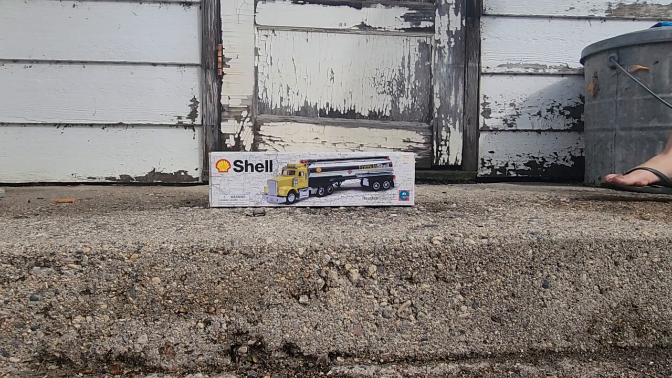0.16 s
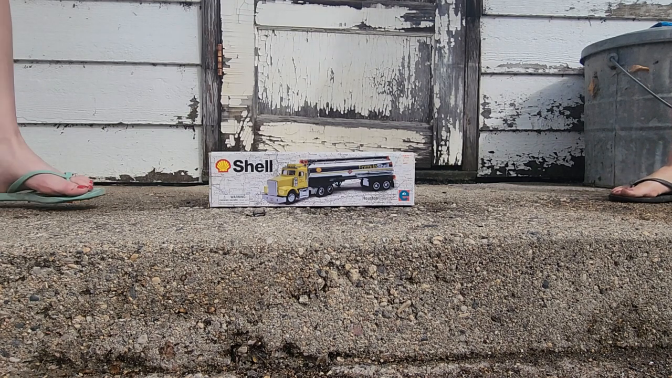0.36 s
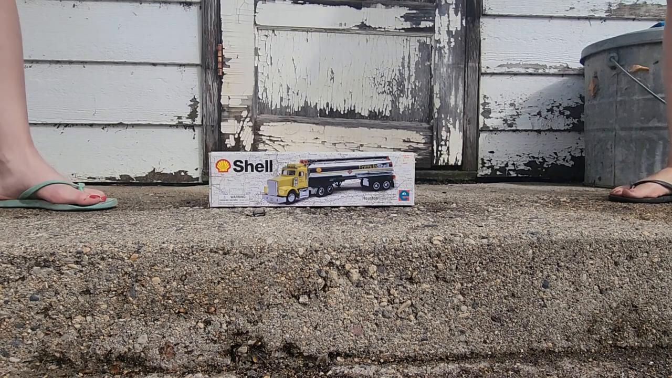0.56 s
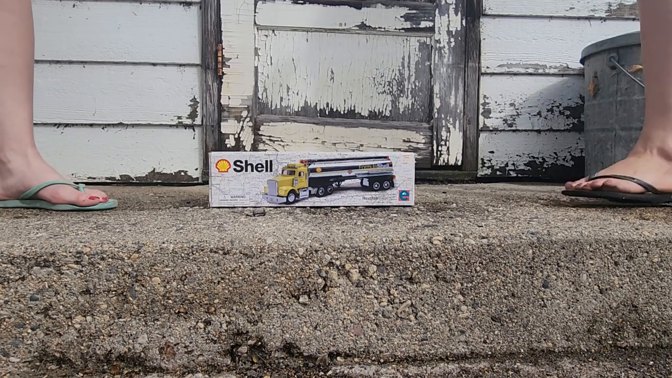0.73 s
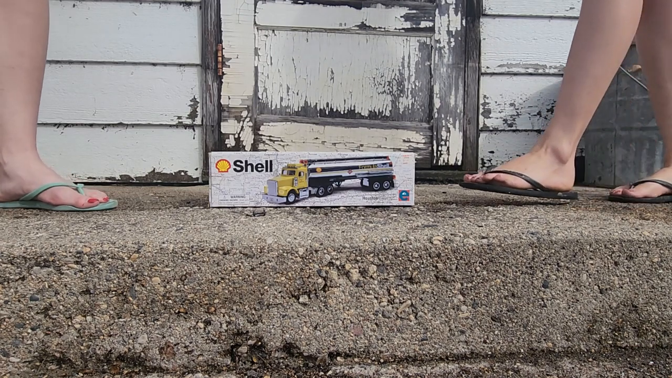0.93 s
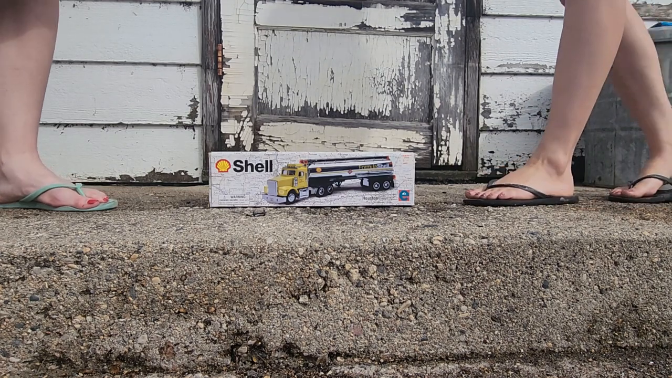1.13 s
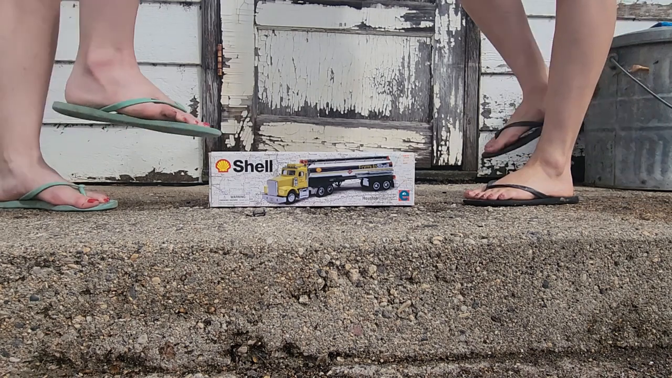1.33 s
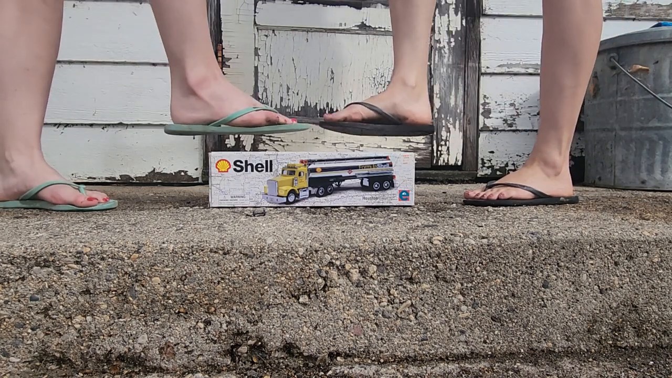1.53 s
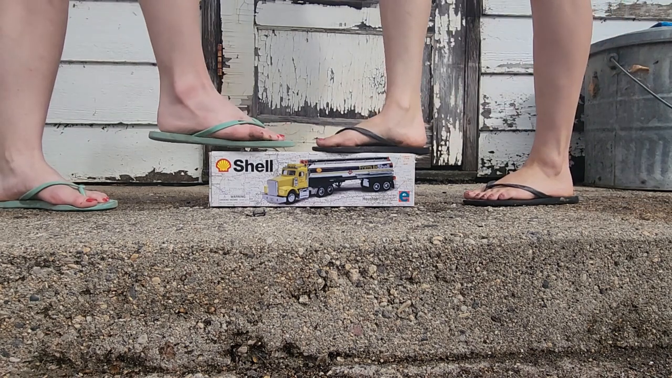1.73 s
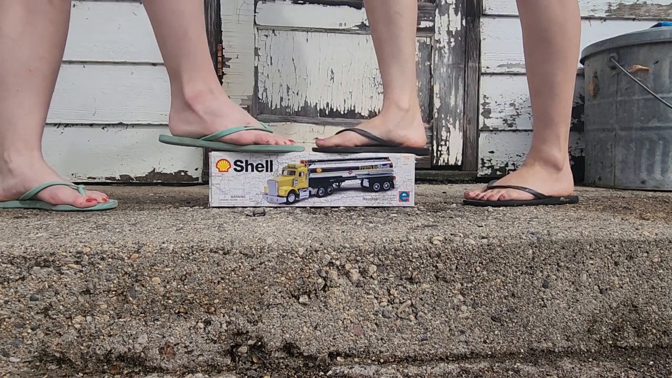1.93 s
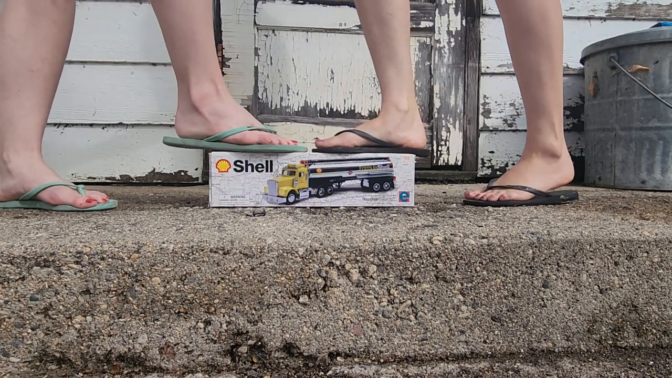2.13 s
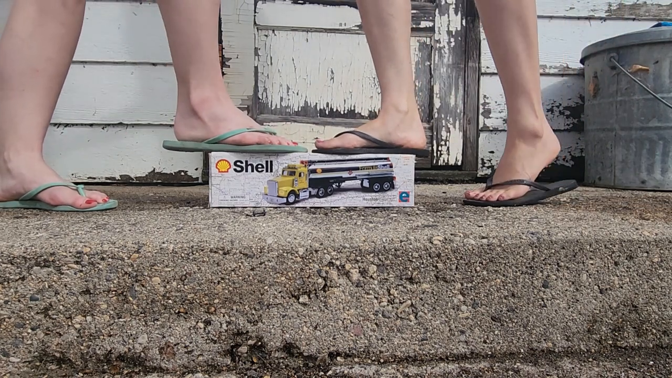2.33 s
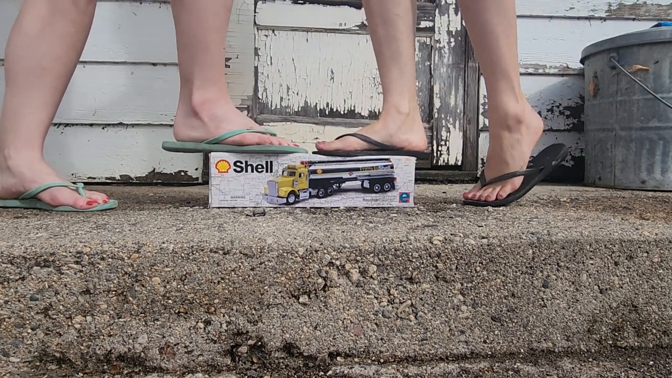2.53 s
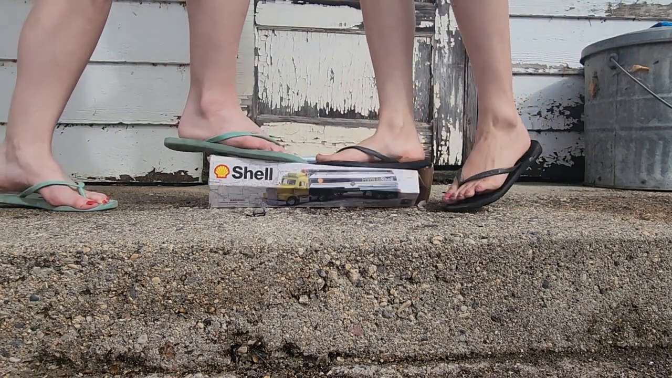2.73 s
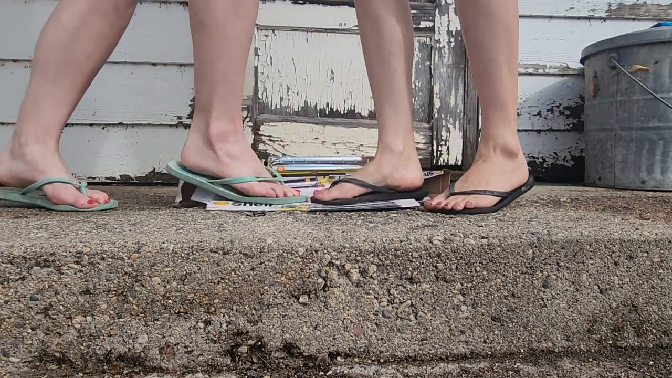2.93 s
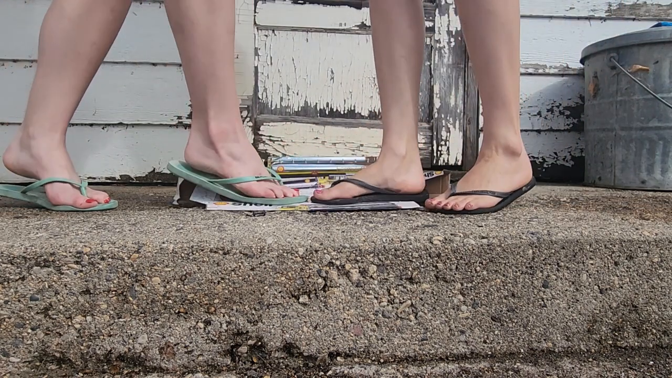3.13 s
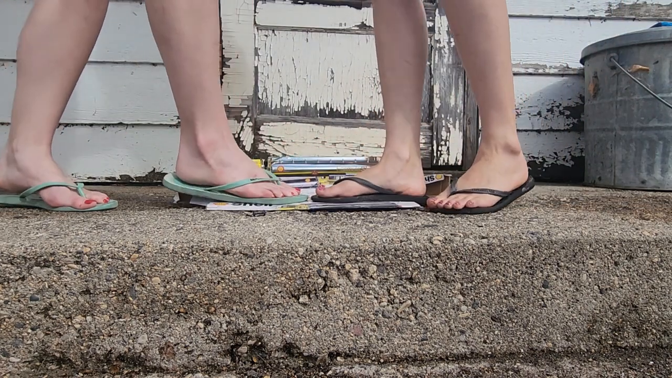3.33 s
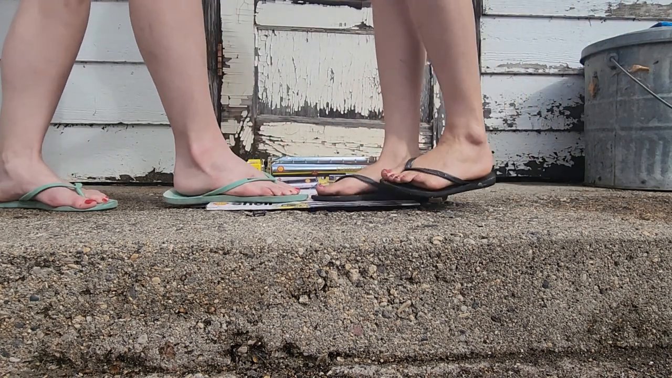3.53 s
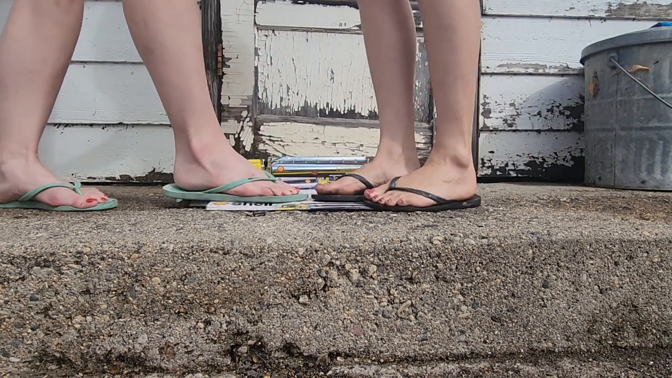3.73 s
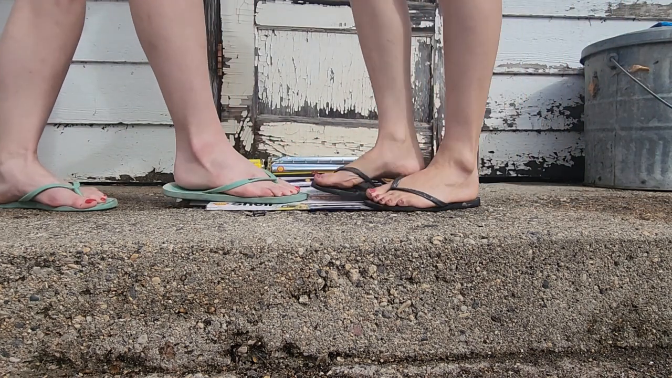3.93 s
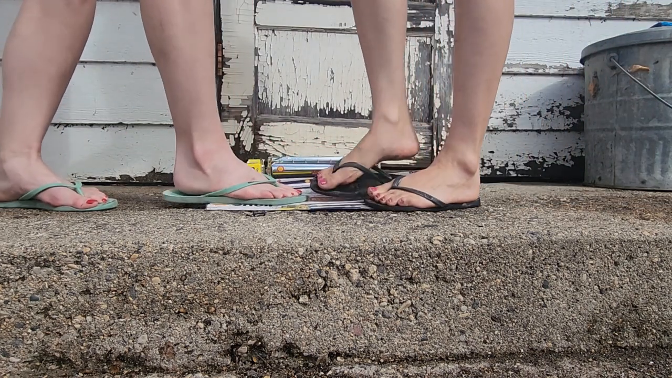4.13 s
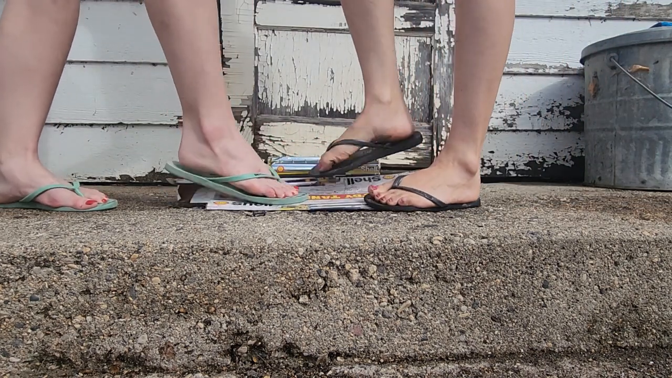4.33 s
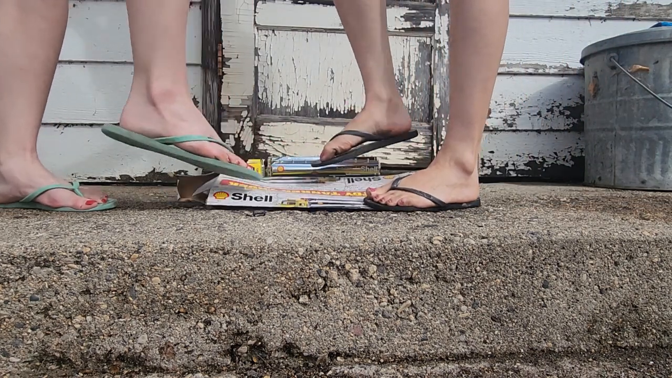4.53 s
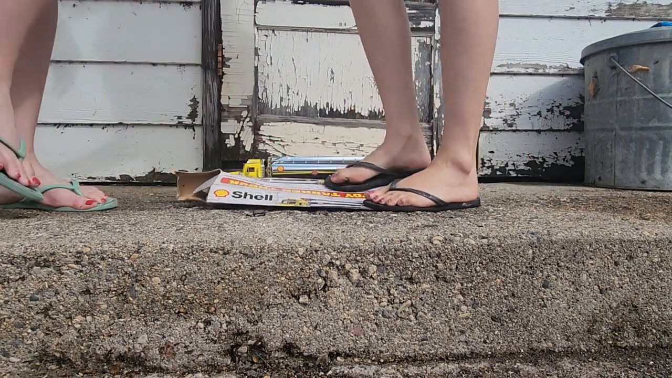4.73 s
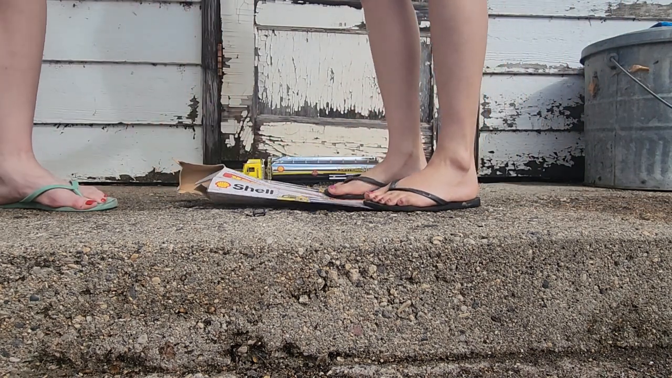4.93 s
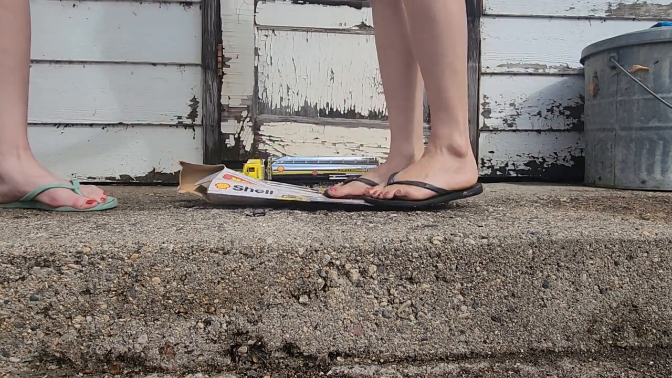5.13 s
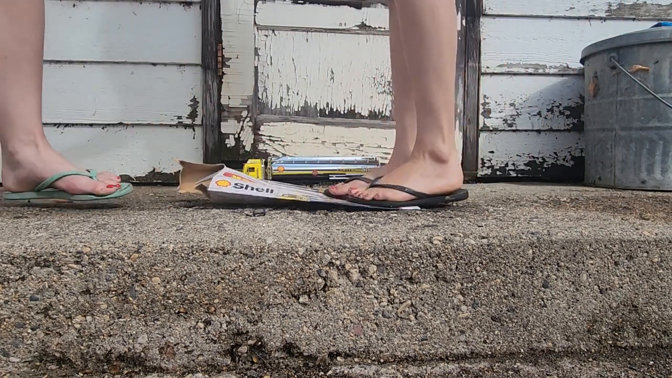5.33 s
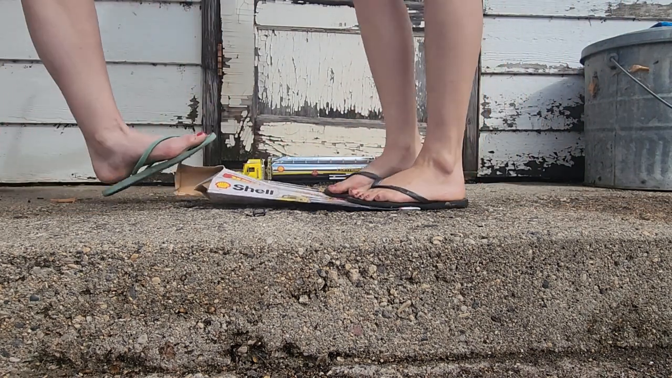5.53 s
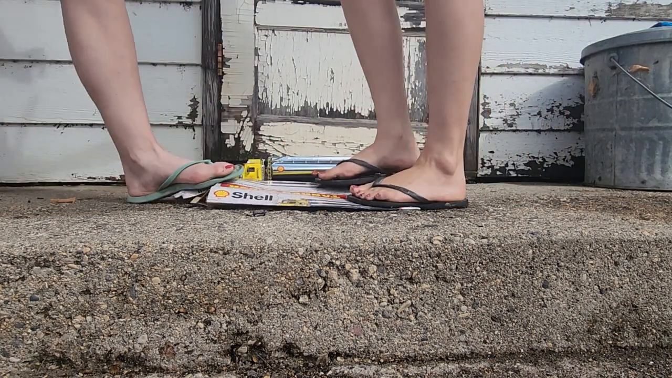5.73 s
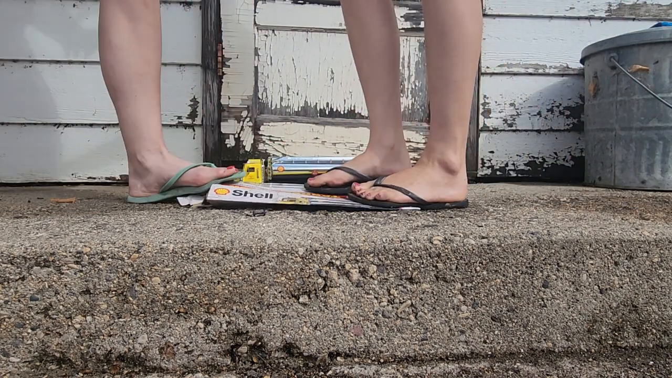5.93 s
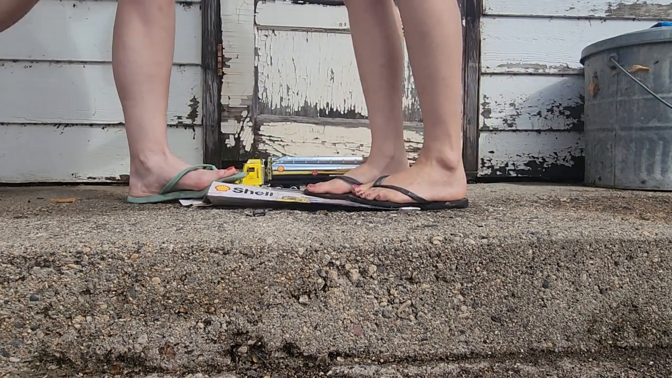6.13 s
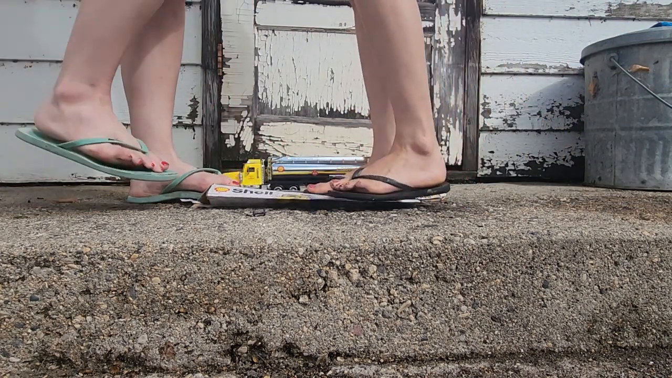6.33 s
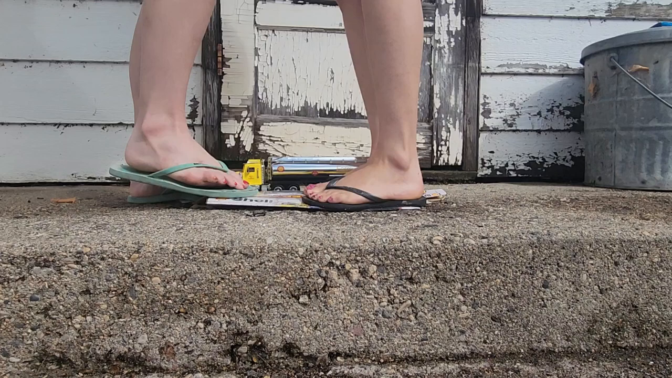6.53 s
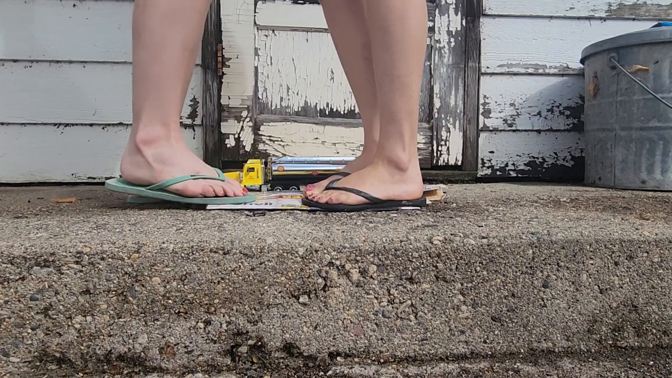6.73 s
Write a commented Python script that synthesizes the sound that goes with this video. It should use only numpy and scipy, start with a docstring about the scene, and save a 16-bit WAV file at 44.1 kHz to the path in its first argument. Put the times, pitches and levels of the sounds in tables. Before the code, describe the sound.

Outdoors, close and fairly dry, faint distant leaf hiss and a very low wind rumble run throughout. From 0 to 1.5 s there are only tiny grit ticks and faint footfalls of rubber soles on concrete. At 1.7 s a sole lands on a cardboard box with a hollow, dull knock; the board creaks softly, with small pops from 2.2 s. Around 2.63 s it begins giving way, and from 2.76 to 3.0 s comes the loud crunch: deep boxy thuds, dense crumpling and tearing, bright brittle plastic snaps and a brief hollow ring, with a short wall echo. Everything after is much quieter: a sharp crack at 3.2, scuffs and clacks to 3.7, a cluster of cardboard knocks and ticks at 4.3-4.9, rubs at 5.2-5.9, then sandy scraping and crisp cracks at 6.3-6.4 and a final snappy clack around 6.6.

```python
"""Distant leaves hiss over a light wind rumble and grit ticks underfoot; then a boxed plastic toy truck is trodden flat.
Feet in flip-flops on a concrete step, before a shed wall: the carton knocks are pitched clicks with slips running on.
Brittle snaps are brighter breaks that ring the hollow truck; crumpling and shuffling soles are dense stick-slip trains.
The wall echoes, the step and yard add a short tail; leaves and wind are shaped, drifting stereo noise."""
import sys
import numpy as np
from scipy import signal
from scipy.fft import rfft, irfft, next_fast_len
from scipy.io import wavfile
from scipy.ndimage import uniform_filter1d, map_coordinates

SR = 44100
rng = np.random.default_rng(int(sys.argv[2]) if len(sys.argv) > 2 else 0)


def transcribe(signal):
    """Save signal, clipped to [-1, 1], as a 16-bit WAV file at the path in sys.argv[1]."""
    frames = np.atleast_2d(signal).T
    limited = np.clip(frames, -1, 1)
    pcm = np.round(limited * 32767).astype(np.int16)
    wavfile.write(sys.argv[1], SR, pcm)


N = 302922
FLAT_S = 3.1  # from here on the box lies flat

# bright spectrum of creasing and tearing board: frequency_hz, relative_level_db
CREASE_SPECTRUM = [(600, -81), (1800, -4), (3200, 4), (5000, 3), (6300, 0.5), (8000, 1), (9800, -11.5),
                   (16000, -13)]
# bright spectrum of sand under a sole: frequency_hz, relative_level_db
SAND_SPECTRUM = [(700, -30), (2200, 4.5), (4000, -1), (6000, -0.5), (8200, -1.5), (9800, -12.5),
                 (13000, -12), (16000, -17)]


def gain_of(db):
    """Decibels to amplitude."""
    return 10 ** (np.asarray(db) / 20)


def evened(x):
    """Scales to rms 1."""
    return x / np.sqrt(np.mean(x ** 2) + 1e-20)


def unit(x):
    """Scales to energy 1."""
    return x / np.sqrt(np.sum(x ** 2) + 1e-20)


def read(points, hz):
    """Reads a curve on a log-frequency axis."""
    f, value = np.transpose(points)
    return np.interp(np.log(hz + 1e-6), np.log(f), value)


def over_time(points):
    """Draws a curve of (time, value) points sample by sample."""
    return np.interp(np.arange(N) / SR, *np.transpose(points))


def add(mix, s, sound):
    """Mixes a sound in at time s, cut off at the end of the mix."""
    part = mix[round(s * SR):][:len(sound)]
    part += sound[:len(part)]


def click(spectrum, hz=1, size=2048):
    """The causal (minimum-phase) click of energy 1 with this spectrum, scaled up to pitch hz."""
    frequency = abs(np.fft.fftfreq(size, 1 / SR))
    log_gain = np.log(gain_of(read(spectrum, frequency / hz)))
    response = np.exp(np.conj(signal.hilbert(log_gain)))
    return unit(np.fft.ifft(response).real[:size // 2])


def slips(count, per_s, spread_db):
    """A train of tiny stick-slip clicks of very uneven size and random sign, rms 1."""
    level_db = spread_db * np.minimum(rng.exponential(1, count), 3)
    size = gain_of(level_db) * rng.choice([-1, 1], count)
    happens = rng.random(count) < per_s / SR
    return evened(size * happens)


def fracture(colour, run_s, after, per_s, size=4096):
    """One break and the fading smaller slips that run on from it, at rms 1 over 10 ms."""
    t, run_s = np.arange(size) / SR, max(run_s, 1e-4)
    share = after * np.sqrt(run_s / 0.0093)  # a longer break puts more of its energy into the slips
    force = share * unit(slips(size, per_s, spread_db=2.0) * np.exp(-t / run_s))
    force[0] = 1
    return unit(signal.fftconvolve(force, colour)) * np.sqrt(SR / 100)


def strokes(rows, attack_s, release_s):
    """Each stroke builds up, holds and dies away: the gains of its dull and its bright part."""
    t, power = np.arange(0, N / SR, .001), 0
    for s, length, dull_db, bright_db in rows:
        fade = np.maximum(s - t, 0) / attack_s + np.maximum(t - s - length, 0) / release_s
        envelope = np.exp(-np.minimum(fade, 20))
        power = power + (gain_of([[dull_db], [bright_db]]) * envelope) ** 2
    return [np.interp(np.arange(N) / SR, t, gain) for gain in np.sqrt(power)]


def friction(gains, dull, bright, per_s, spread_db):
    """Dense slips shake the board; the same slips, with finer ones between, give the bright edge."""
    dull_gain, bright_gain = gains
    coarse, fine = slips(N, per_s, spread_db), slips(N, 2 * per_s, spread_db)
    body = signal.oaconvolve(coarse * dull_gain, click(dull))
    edge = signal.oaconvolve(evened(coarse + fine) * bright_gain, click(bright))
    return (body + edge)[:N]


def air(spectrum, curve, patchy_db):
    """Outdoor noise with drifting patches, its left-right likeness strongest in the bass."""
    # left-right likeness: frequency_hz, correlation (-1 to 1)
    likeness = [(20, .8), (60, 0.82), (130, 0.93), (290, 0.65), (640, -.15), (1400, -.15), (3000, 0.01)]
    hz = np.fft.rfftfreq(2048, 1 / SR)
    a, b, c, d, patches = rng.standard_normal((N // 512 + 5, len(hz), 5)).T
    patches = uniform_filter1d(patches, size=20, axis=0)
    patches = evened(uniform_filter1d(patches, size=8, axis=1))
    same = np.clip(read(likeness, hz), -1, 1)[:, None]
    left, other = a + 1j * b, c + 1j * d
    z = np.array([left, same * left + np.sqrt(1 - same ** 2) * other])
    z *= gain_of(read(spectrum, hz)[:, None] + patchy_db * patches)
    noise = signal.istft(z, nperseg=2048, noverlap=1536)[1][:, :N]
    return evened(noise) * gain_of(over_time(curve))


def leaves():
    """Countless far-off leaf contacts blur into a hiss that follows the breeze."""
    # leaf hiss: frequency_hz, relative_level_db
    hiss = [(100, -8), (180, 3), (300, -2), (600, -3.5), (1100, -4), (1600, -1.5), (2200, 1.5),
            (2900, -2.5), (4000, -0.5), (5200, -6), (6400, -7.5), (7800, -7.5), (9800, -23), (16000, -30)]
    # strength of the breeze: time_s, relative_level_db
    breeze = [(0, -52), (0.6, -50.5), (1.3, -51), (2.3, -50.5), (3.1, -53.5), (3.9, -55), (5.1, -55),
              (6.1, -53), (6.87, -53)]
    return air(hiss, breeze, patchy_db=1.16)


def wind():
    """Light wind pushes at the microphones as a low, gusting rumble."""
    # wind rumble: frequency_hz, relative_level_db
    rumble = [(10, -12.5), (30, -2.5), (55, -1.5), (95, 0), (135, -5), (185, -4.5), (280, -15),
              (600, -21.5), (2000, -53)]
    # strength of the gusts: time_s, relative_level_db
    gusts = [(0, -63.5), (0.9, -63.5), (1.9, -55), (3.15, -55.5), (4.0, -57.5), (4.9, -60), (5.35, -57.5),
             (5.9, -60), (6.3, -58), (6.87, -61)]
    return air(rumble, gusts, patchy_db=2.0)


def microphones(x, twist, shade_db, port_turn):
    """The left microphone hears the feet first and louder; the housing twists the phase at the right."""
    # where the feet bear down: time_s, lead_of_left_microphone_s
    place = [(1.7, .00008), (2.66, .0001), (2.79, .00005), (2.86, .00006), (2.9, .00024), (2.97, .0003),
             (3.2, .00014), (4.3, .00006), (5.3, .00008), (5.6, .00026), (6.35, .00007), (6.58, .0002)]
    lead_s, size = over_time(place), next_fast_len(N, True)
    late = map_coordinates(x, [np.arange(N) - lead_s * SR], order=3)
    f, knots = np.fft.rfftfreq(size, 1 / SR), np.arange(0, SR, 500)
    # random phase bends, in radians, growing in from 1900 to 3800 Hz
    bend = twist * rng.standard_normal(len(knots)) * np.clip(knots / 1900 - 1, 0, 1)
    lag = port_turn * f / 500 * np.exp(1 - f / 500)  # long waves take the way round the housing
    turn = np.exp(1j * (np.interp(f, knots, bend) - lag))
    right = irfft(rfft(late, size) * turn, size)[:N]
    shade = gain_of(shade_db * lead_s / lead_s.max() / 2)
    return np.array([x * shade, right / shade])


def yard(x, wet_db):
    """The wall returns one echo, the step scatters a short tail, the yard answers faintly."""
    # decay of the near tail: frequency_hz, t60_s
    near_t60 = [(150, 0.02), (600, 0.28), (2000, 0.18), (6000, 0), (14000, 0.27)]
    # colour of the whole tail: frequency_hz, relative_level_db
    tail_colour = [(120, -17), (350, -6), (900, -3), (2500, 0), (6000, 0), (14000, 0.5)]
    wall_s, wall_db = 0.004543, -19.5  # delay of the wall echo, and its level in the bass
    count = SR // 2
    taps = rng.choice([-1., 1.], (2, count)) * (rng.random((2, count)) < 5000 / SR)
    taps[:, :round(.001 * SR)] = 0
    hz, t, z = signal.stft(evened(taps), SR, nperseg=256)
    t60 = read(near_t60, hz)[:, None]
    near = gain_of(-60 * t / t60) * np.sqrt(2 * np.log(1000) / (t60 * SR))
    far = gain_of(-68 - 97 * t)  # faint, falling 97 dB per second
    colour = gain_of(wet_db + read(tail_colour, hz))[:, None]
    tail = signal.istft(z * (near + far) * colour, SR, nperseg=256)[1]
    size = next_fast_len(N, True)
    f = np.fft.rfftfreq(size, 1 / SR)
    wall = gain_of(wall_db) * np.exp(-2j * np.pi * f * wall_s) / (1 + 1j * f / 4000)  # wood dulls the echo
    echoed = irfft(rfft(x, size) * (1 + wall), size)[:N]
    direct = microphones(echoed, twist=1.8, shade_db=3.8, port_turn=0.33)
    return direct + signal.oaconvolve(x[None], tail, axes=1)[:, :N]


def thumps():
    """Shifting weight and puffs of air: low pushes that swell and die within two or three cycles."""
    # soft thumps: start_s, envelope_peak_db, pitch_hz
    pushes = [(0.825, -42, 88), (1.785, -36, 50), (2.76, -19, 85), (2.961, -22, 71.5), (3.624, -39.5, 64),
              (3.985, -38.5, 55), (4.311, -27, 115), (4.425, -34.5, 50), (4.612, -33.5, 69),
              (4.703, -29.5, 75), (4.734, -34, 150), (5.178, -39, 43), (5.301, -39, 59), (6.3, -36, 82),
              (6.554, -36, 80), (6.614, -38, 85)]
    out, t = np.zeros(N), np.arange(SR // 5) / SR
    for s, db, hz in pushes:
        swell = t * hz / 0.46
        envelope = swell ** 2 * np.exp(2 * (1 - swell))
        add(out, s, gain_of(db) * envelope * np.sin(2 * np.pi * hz * t))
    return out


def grit():
    """Grains crack between rubber and concrete: a few large ones, and small ones at random."""
    # larger grains: start_s, relative_level_db
    large = [(0.296, -49), (0.388, -55.5), (0.48, -52), (0.565, -49), (0.714, -51), (0.852, -52.5),
             (1.254, -49), (1.814, -52.5), (3.036, -54.5), (3.133, -54), (3.288, -49), (3.519, -51.5),
             (3.709, -52), (4.445, -50), (4.646, -57.5), (5.682, -49.5), (5.776, -50), (5.876, -54.5)]
    small_per_s, small_db = 9, -66  # rate, and relative level of the softest
    out, tick = np.zeros(N), click(SAND_SPECTRUM)
    draws = rng.random((round(small_per_s * N / SR), 2))
    small = [(u * N / SR, small_db + 7 * v) for u, v in draws]
    for s, db in large + small:
        add(out, s, gain_of(db) * fracture(tick, run_s=0.004, after=1.6, per_s=900))
    return out


def scuffs():
    """A sole or the flattened carton drags along: board rubs dully, sand scrapes brightly."""
    # drags: start_s, length_s, rubbing_board_relative_db, scraping_sand_relative_db
    drags = [(.5, .09, -64, -57), (3.23, .06, -45, -61), (3.315, .015, -39, -60), (3.37, .06, -44, -56),
             (3.45, 0.063, -50, -52), (3.62, .04, -52, -65), (3.73, .08, -55, -70), (4.318, .02, -44, -54),
             (4.44, 0.068, -57, -56), (4.785, .07, -49, -63), (4.892, .025, -41.5, -55),
             (5.168, .012, -50, -57), (5.325, .012, -46, -56), (5.495, .05, -46.5, -58),
             (5.555, 0.072, -38, -53), (5.705, 0.088, -44, -51.5), (5.855, .07, -51, -58),
             (6.02, .05, -50, -63), (6.307, .02, -40, -43), (6.34, 0.047, -47.5, -42),
             (6.4, .038, -41, -43.5), (6.495, .025, -47, -60), (6.618, 0.013, -40, -56)]
    # rubbing board: frequency_hz, relative_level_db
    rub = [(60, -21), (220, 0.5), (420, -10), (490, -1.5), (570, 0.5), (720, -6.5), (860, -1.5),
           (1020, -10.5), (1500, -7), (2500, -12), (4000, -25), (8000, -48)]
    gains = strokes(drags, attack_s=0.0087, release_s=.018)  # time constants
    return friction(gains, rub, SAND_SPECTRUM, per_s=1100, spread_db=7.0)


def folds():
    """A sole landing or a panel popping through: a dull thud under a crackle of creasing board or sand."""
    # knocks: start_s, body_relative_db, body_pitch_hz, crackle_relative_db, break_time_constant_s
    knocks = [(0.866, -49, 330, -64, 0.01), (1.092, -49, 800, -57, .013), (1.69, -31, 420, -50, .005),
              (1.696, -22, 255, -48, .016), (1.714, -38, 320, -52, .009), (2.224, -40.5, 255, -62, .011),
              (2.294, -46.5, 920, -63, .014), (2.354, -35.5, 213, -62, .01), (2.499, -40, 430, -56, 0.015),
              (2.543, -37, 326, -44.5, .013), (2.633, -27, 290, -40, 0.012),
              (2.642, -14.5, 273, -45, 0.016), (2.658, -19.5, 320, -42, 0.017),
              (2.707, -26, 367, -37, .012), (2.762, -16, 377, -34, .016), (2.768, -7, 243, -41, .0064),
              (2.794, -13, 301, -36, .006), (2.904, -15, 370, -35, .0074), (2.963, -16.5, 447, -31.5, .006),
              (3.36, -35.5, 900, -46, .012), (3.375, -35, 820, -55, 0.014), (4.13, -54, 700, -66, .006),
              (4.307, -37, 480, -49, .012), (4.319, -31.5, 560, -47, .006), (4.325, -31.5, 560, -47, .006),
              (4.568, -46.5, 470, -65, 0.013), (4.614, -43.5, 590, -66, .021),
              (4.669, -33, 480, -67, 0.0067), (4.703, -27, 800, -56, 0.0068), (4.736, -32, 480, -65, .006),
              (5.302, -39, 660, -54, .004), (5.333, -38.5, 671, -51, .01), (5.551, -38, 560, -48, .009),
              (5.708, -42, 520, -46, .02), (6.552, -28.5, 490, -44.5, .006), (6.61, -34, 700, -42, .014)]
    # panel body: multiple_of_pitch, relative_level_db
    panel = [(.06, -51), (.25, -12), (.6, -2), (.95, 3), (1.5, -6), (3, -19.5), (6, -26), (14, -53)]
    out, crackle = np.zeros(N), click(CREASE_SPECTRUM)
    for s, body_db, hz, crackle_db, run_s in knocks:
        body = fracture(click(panel, hz), run_s, after=1.0, per_s=2900)
        add(out, s, gain_of(body_db) * body)
        add(out, s, gain_of(crackle_db) * fracture(crackle, run_s, after=1.4, per_s=1400))
    return out


def flat_carton(blows):
    """Once it lies flat, the carton resonates to each knock with a hollow clack."""
    # carton resonances: frequency_hz, width_hz, filter_gain_db
    resonances = [(570, 55, -1), (845, 40, -14)]
    late = blows * (np.arange(N) >= FLAT_S * SR) + 1e-12
    out = blows
    for hz, width, db in resonances:
        out = out + gain_of(db) * signal.lfilter(*signal.iirpeak(hz, hz / width, SR), late)
    return out


def crush():
    """The carton creaks under the weight, then gives way in stages of crumpling and tearing."""
    # stages: start_s, length_s, crumpling_board_relative_db, tearing_fibres_relative_db
    gives = [(1.91, 0.26, -52.5, -70), (2.46, .1, -47, -51), (2.575, .04, -42, -44),
             (2.635, 0.034, -24, -45), (2.728, .03, -28, -32.5), (2.765, .07, -15, -37),
             (2.835, .03, -19, -31.5), (2.928, 0.044, -26, -33)]
    # crumpling board: frequency_hz, relative_level_db
    crumple = [(30, -30), (100, -13), (190, -0.5), (260, 6.5), (370, -8.5), (600, -0.5), (1100, -11.5),
               (2200, -8), (3500, -25.5), (7000, -47.5)]
    gains = strokes(gives, attack_s=0.009, release_s=.016)  # time constants
    return friction(gains, crumple, CREASE_SPECTRUM, per_s=1600, spread_db=5.5)


def snaps():
    """Brittle plastic parts break: a pitched shell knock with a sharp, bright crack."""
    # breaks: start_s, body_relative_db, body_pitch_hz, crack_relative_db, break_time_constant_s
    breaks = [(2.79, -14, 1100, -20, .003), (2.797, -15, 980, -33, .0095), (2.811, -14, 1080, -40, .008),
              (2.815, -15.5, 1010, -28.5, .003), (2.825, -13, 1000, -28.5, 0.006),
              (2.84, -22, 1250, -28, .012), (2.856, -25, 866, -35, .02), (2.927, -16.5, 1100, -32.5, .011),
              (3.202, -30, 1450, -30.5, .011), (3.446, -38, 1600, -31, 0.0074),
              (3.49, -42, 1330, -48, .013), (3.655, -41, 1250, -55.5, .0043),
              (4.048, -42.5, 1175, -41, .0091), (4.275, -43, 1600, -51, .0035),
              (4.339, -34.5, 1010, -42, .0025), (4.39, -42, 1200, -50, .012),
              (4.433, -40.5, 1800, -51, .0072), (4.889, -38.5, 1690, -47, 0.016),
              (5.858, -44, 1300, -56, .008), (6.118, -42, 1450, -52.5, .0081), (6.18, -47, 900, -56, .008),
              (6.305, -36.5, 1980, -43, 0.021), (6.394, -35, 1470, -39, .015),
              (6.41, -33.5, 1590, -35, 0.016), (6.617, -23, 1670, -40.5, .011)]
    # shell body: multiple_of_pitch, relative_level_db
    shell = [(.08, -19), (.3, -15.5), (.7, -4), (1.2, -5.5), (2.2, -12.5), (4, -23), (9, -68)]
    # bright crack: frequency_hz, relative_level_db
    crack_spectrum = [(700, -18.5), (2000, -1), (2700, -6), (3300, 6), (4300, 3), (5500, 3), (6800, 1),
                      (8000, -2.5), (9800, -17.5), (16000, -25)]
    out, crack = np.zeros(N), click(crack_spectrum)
    for s, body_db, hz, crack_db, run_s in breaks:
        body = fracture(click(shell, hz), run_s, after=0.99, per_s=1600)
        add(out, s, gain_of(body_db) * body)
        add(out, s, gain_of(crack_db) * fracture(crack, run_s, after=1.2, per_s=1600))
    return out


def truck(blows):
    """The hollow body rings on, as decaying sines, after whatever breaks in or around it."""
    # body modes: frequency_hz, relative_level_db, t60_s
    modes = [(190, 3, .1), (484, 0, .17), (577, -3, .16), (667, -4, .16), (711, -1, .15), (847, -6, .16),
             (897, -5, .16), (1329, 2, .17), (1525, -3, .14), (1605, -4, .15), (2164, -7, .14),
             (2295, -7, .13)]
    t = np.arange(SR // 2) / SR
    ring = sum(gain_of(db - 60 * t / t60) * np.sin(2 * np.pi * hz * t) for hz, db, t60 in modes)
    return signal.oaconvolve(blows, unit(ring))[:N]


def scene():
    """Carton, truck and feet on the step, over the open air."""
    outdoors = gain_of(0.73) * leaves() + gain_of(4.5) * wind()
    feet = yard(gain_of(-2.5) * scuffs() + gain_of(2.5) * grit(), wet_db=.5)
    carton = yard(gain_of(-1.5) * flat_carton(folds()), wet_db=-2.0)
    plastic = gain_of(-3.0) * snaps() + gain_of(-5.0) * crush()
    hollow = np.arange(N) < FLAT_S * SR  # once flattened, the truck is no longer set ringing
    ringing = gain_of(-17.0) * truck(plastic * hollow)
    toy = yard(plastic + ringing, wet_db=-5.0)
    return toy + carton + feet + thumps() + outdoors


def record(dry):
    """Rounds the loudest peaks off just under full scale, then rolls off the top of the treble."""
    rounded = dry / (1 + abs(dry / .92) ** 6) ** (1 / 6)
    lowpass = signal.firwin(511, 16250, window=("kaiser", 9), fs=SR)  # cutoff in Hz
    return signal.oaconvolve(rounded, lowpass[None], "same")


dry = scene()
out = record(dry)
transcribe(out)
```